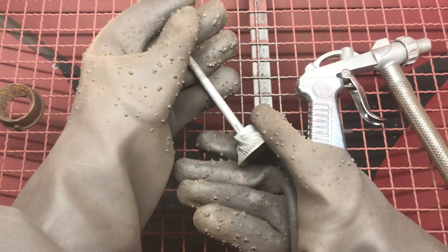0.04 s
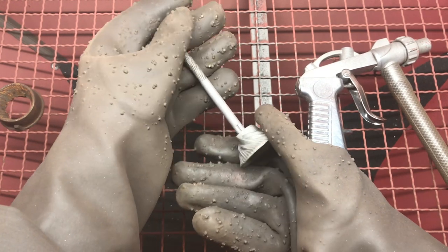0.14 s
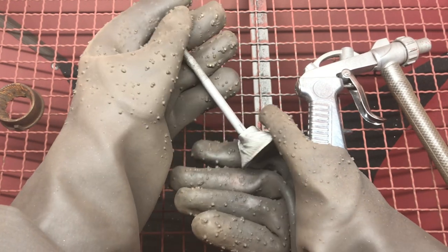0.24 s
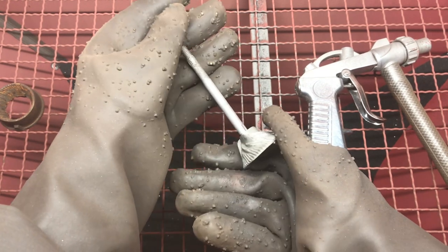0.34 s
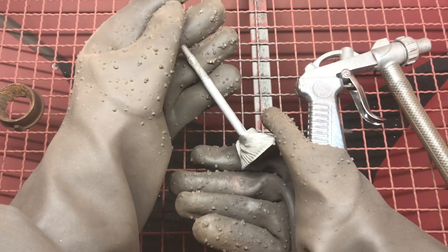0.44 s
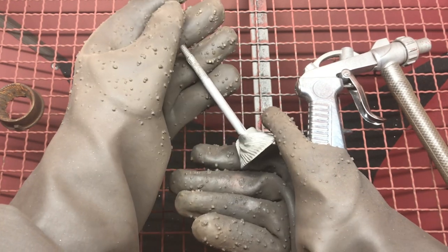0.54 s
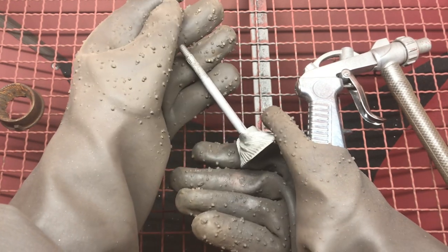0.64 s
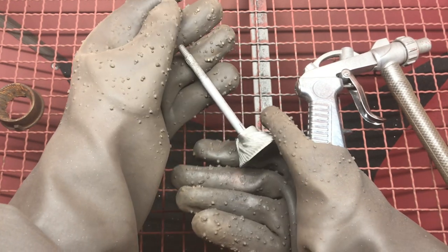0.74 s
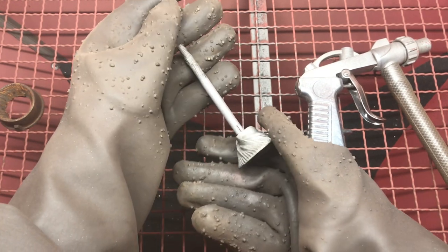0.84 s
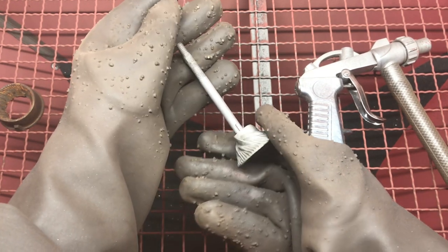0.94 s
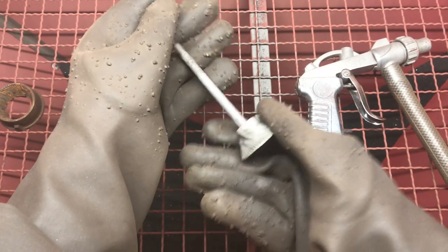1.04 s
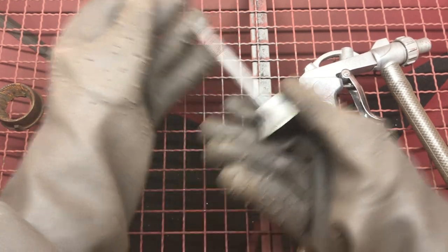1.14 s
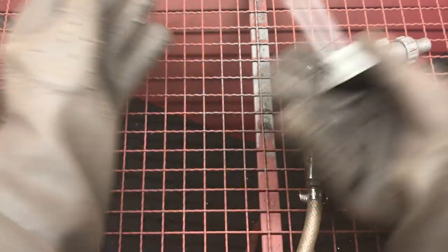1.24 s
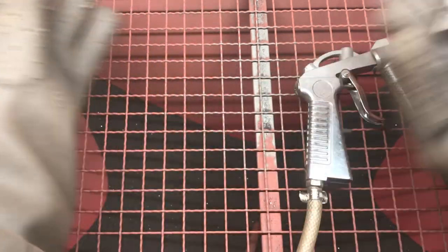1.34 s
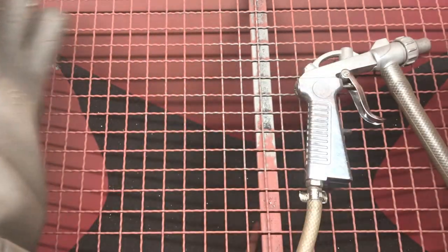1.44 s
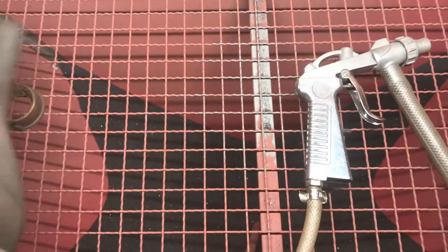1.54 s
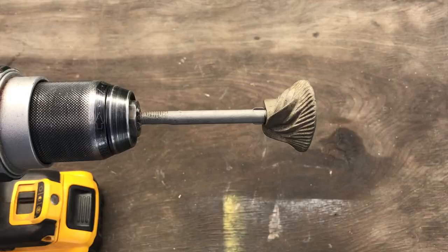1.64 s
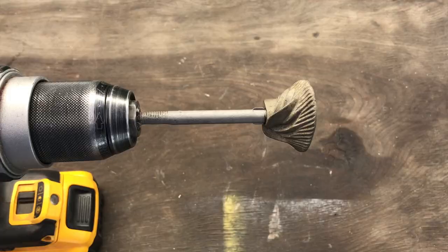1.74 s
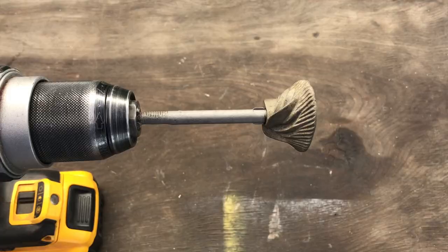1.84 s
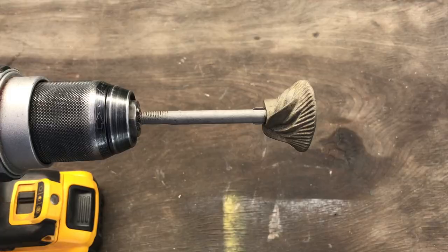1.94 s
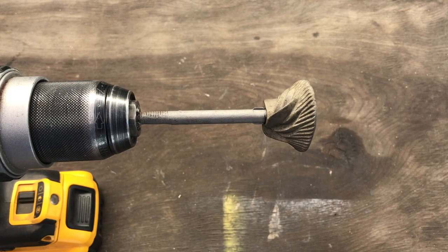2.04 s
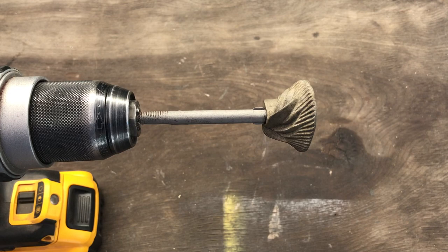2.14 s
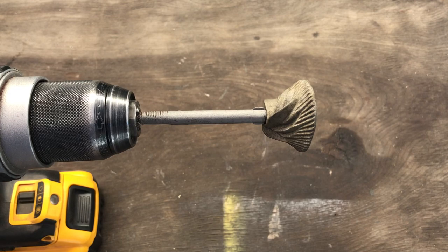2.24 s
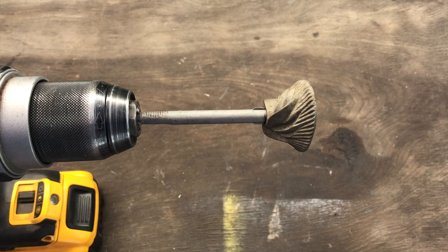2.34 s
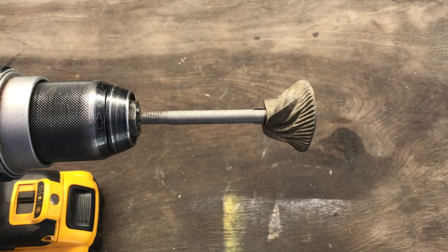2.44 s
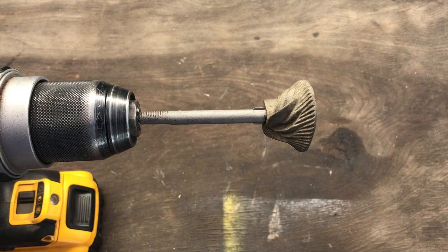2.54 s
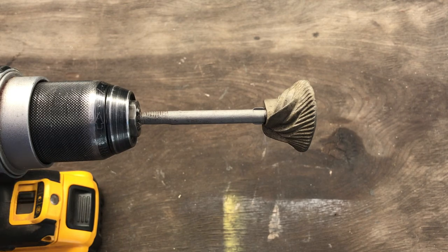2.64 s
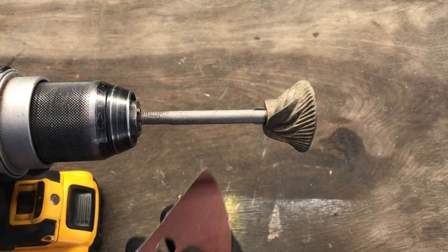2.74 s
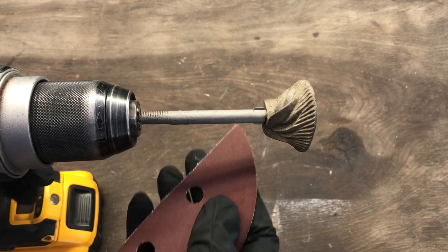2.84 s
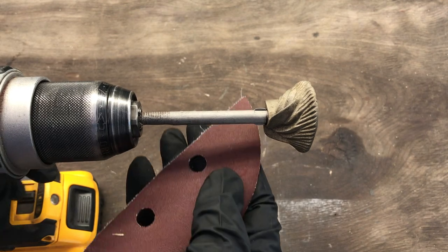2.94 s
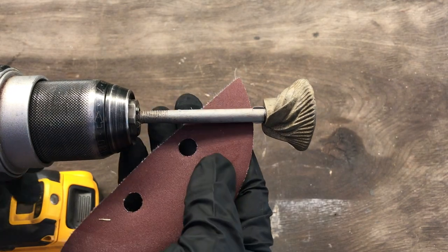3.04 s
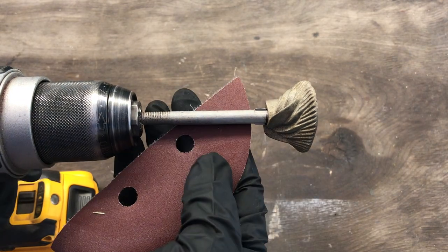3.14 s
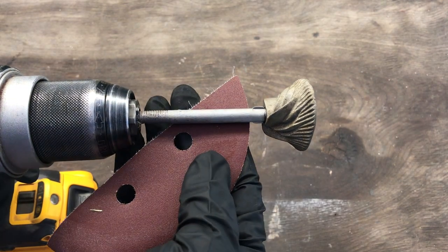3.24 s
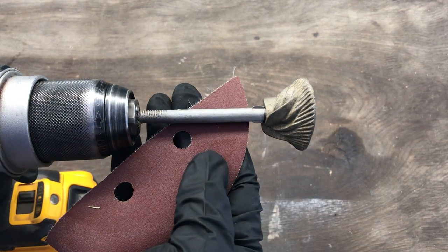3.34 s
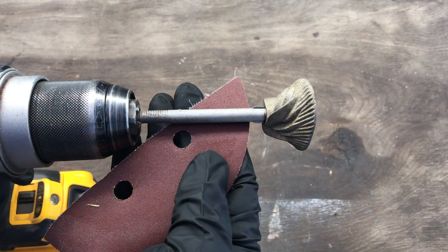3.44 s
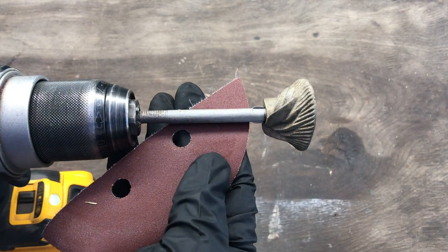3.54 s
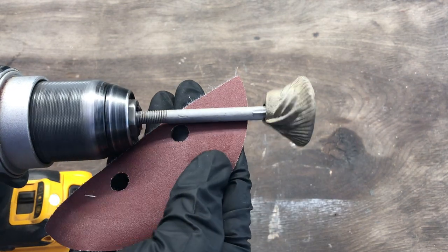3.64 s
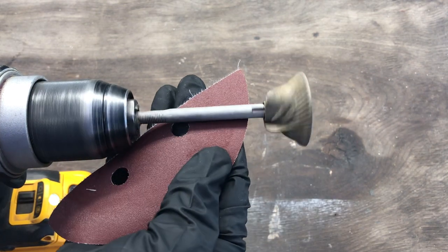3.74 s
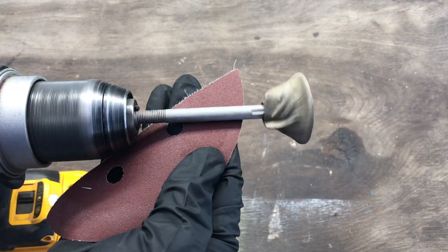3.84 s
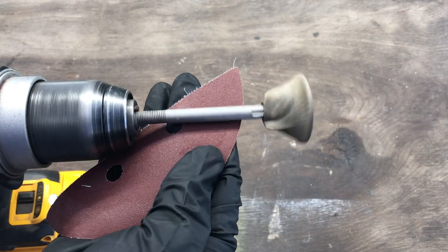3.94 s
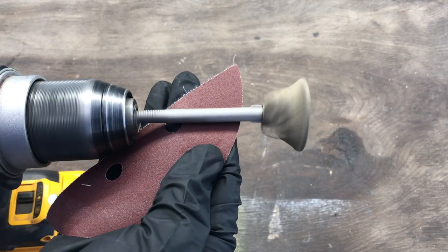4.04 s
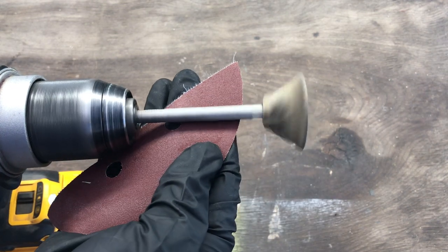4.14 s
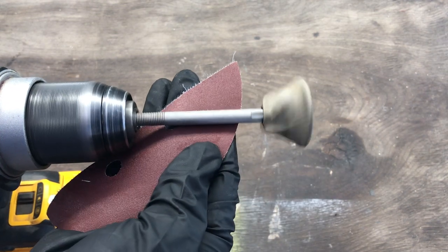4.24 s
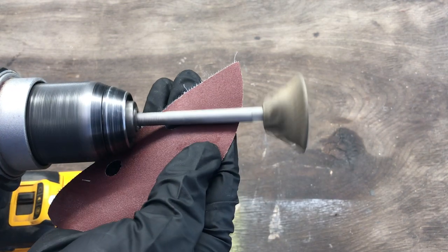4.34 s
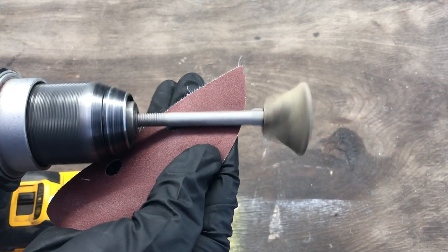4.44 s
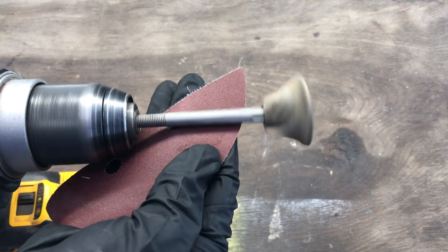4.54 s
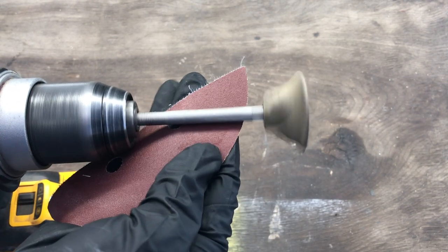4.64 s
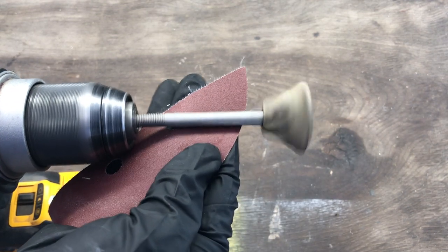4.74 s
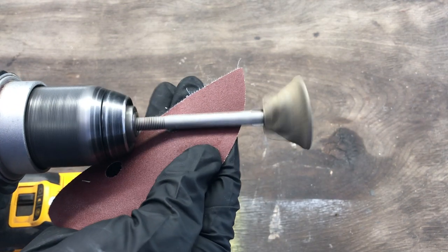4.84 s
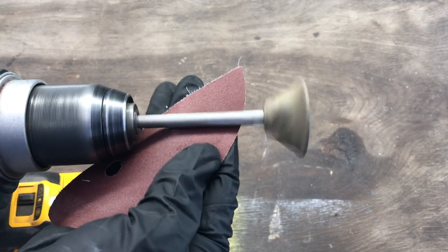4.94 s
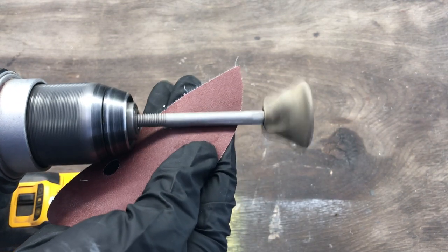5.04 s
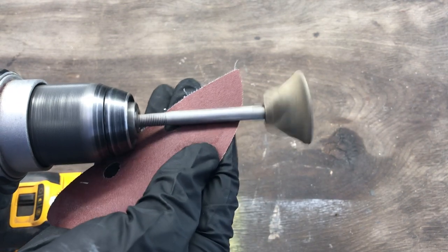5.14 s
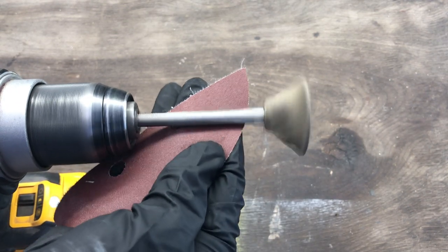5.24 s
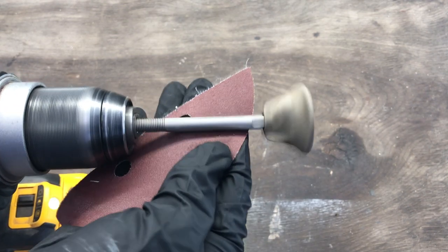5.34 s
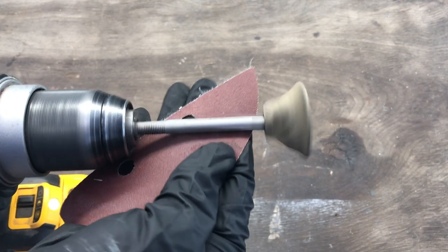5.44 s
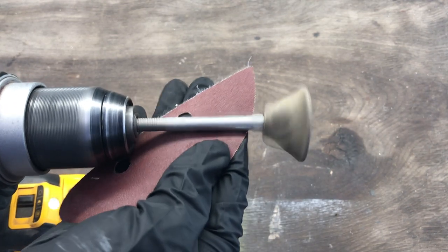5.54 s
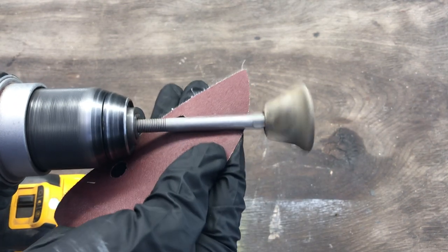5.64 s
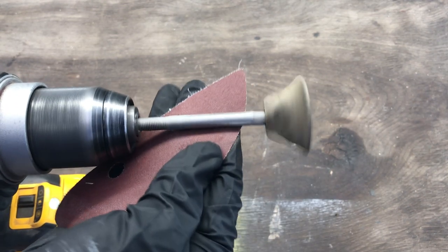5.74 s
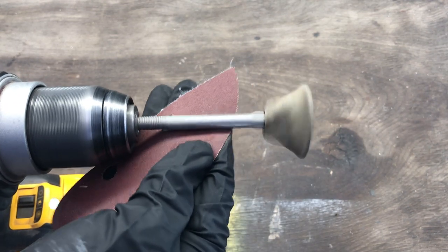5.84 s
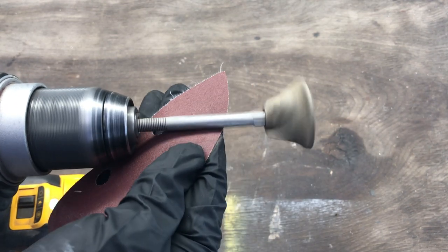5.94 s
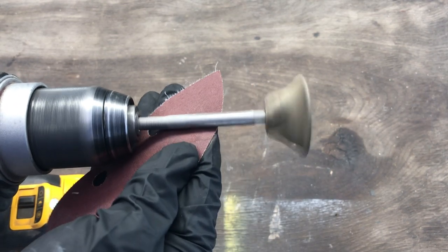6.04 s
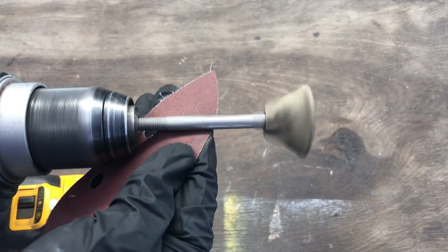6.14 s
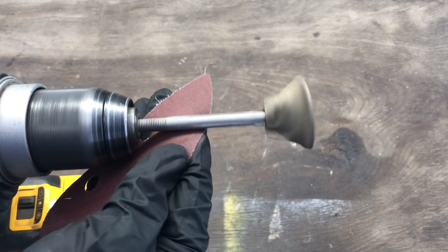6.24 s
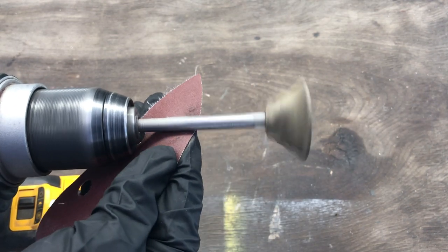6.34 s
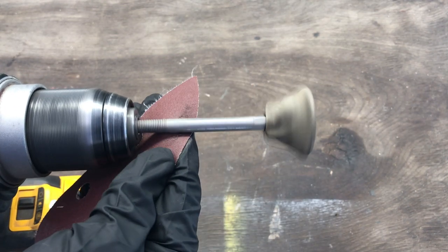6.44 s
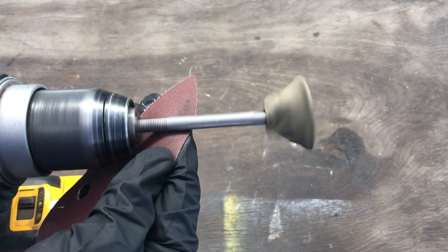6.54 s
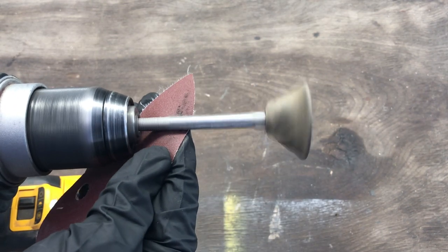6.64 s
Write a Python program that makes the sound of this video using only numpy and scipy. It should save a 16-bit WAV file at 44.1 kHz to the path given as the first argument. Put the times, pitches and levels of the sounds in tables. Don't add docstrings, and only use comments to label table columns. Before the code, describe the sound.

Boxy fan hum and whistling air, then near-silence with dry paper snaps, before a drill creeps, climbs in steps to full whine, abrasive paper hissing.

```python
import sys
import numpy as np
from scipy import signal
from scipy.fft import rfft, irfft
from scipy.io import wavfile

SR = 44100
rng = np.random.default_rng(int(sys.argv[2]) if len(sys.argv) > 2 else 0)


def wrap_up_sound(samples):
    columns = np.atleast_2d(samples).T
    tamed = np.clip(columns, -1, 1)
    steps = np.round(tamed * 32767).astype(np.int16)
    wavfile.write(sys.argv[1], SR, steps)


def invert_db(level):
    return 10 ** (np.asarray(level, dtype=float) / 20)


N = 295470
T = np.arange(N) / SR
HZ = np.maximum(np.arange(N // 2 + 1) * SR / N, 1)

FULL_SPEED = 384.5
MOTOR_ON_S, CREEP_TURNS = 3.55, 30
BITE_TURNS = 155


def at_hz(points, hz):
    points = np.array(points)
    return np.interp(np.log(hz), np.log(points[:, 0]), points[:, 1])


def rms_one(x):
    return x / np.sqrt(np.mean(x ** 2) + 1e-20)


def drift(rate):
    r = np.exp(-80 * np.pi * rate / SR)
    noise = rng.standard_normal(N // 40 + 2002)
    slow = signal.lfilter([1], [1, -2 * r, r * r], noise)[2000:]
    return np.interp(np.arange(N) / 40, np.arange(len(slow)), rms_one(slow))


def swell(start, length, attack, release):
    rise = np.clip((T - start) / attack + 1, 0, 1) ** 2
    return rise * np.exp(-np.maximum(T - start - length, 0) / release)


def ring(clicks, hz, t60):
    r, w = invert_db(-60 / (t60 * SR)), 2 * np.pi * hz / SR
    return signal.lfilter([0, np.sin(w)], [1, -2 * r * np.cos(w), r * r], clicks + 1e-18)


def line(phase, rough, rate):
    in_step = (1 + rough * drift(rate)) * np.sin(phase)
    return np.sqrt(2) * (in_step + rough * drift(rate) * np.cos(phase))


def grains(per_s, spread_db):
    sizes = invert_db(spread_db * np.minimum(rng.exponential(1, N), 5)) * rng.choice([-1, 1], N)
    return sizes * (rng.random(N) < per_s / SR)


def shaped(x, colour_db, patchy_db, ref=(20, 20000)):
    spec = rfft(x) * invert_db(colour_db) * (HZ < 15760)
    in_ref = (HZ > ref[0]) & (HZ < ref[1])
    spec = spec / np.sqrt(2 * np.sum(abs(spec[in_ref]) ** 2)) * N
    out, together = 0, drift(6.2)
    for octave in range(4, 15):
        share = np.cos(np.pi / 2 * np.clip(np.log2(HZ) - octave, -1, 1)) ** 2
        flicker = invert_db(patchy_db * (0.4 * together + 0.29 * drift(37)))
        out = out + irfft(spec * share, N) * flicker
    return out


def drill():
    turns = motor_speed()
    shake = (turns / FULL_SPEED) ** 3
    slack = 1 - np.minimum(shake, 1)
    strain = np.tanh(np.maximum(np.gradient(np.log(turns)) * SR, 0) / 13.4)
    unsteady_turns = turns * (1 + .0006 * drift(5) + .002 * drift(60))
    angle = 2 * np.pi * np.cumsum(unsteady_turns) / SR
    creeping = np.clip(1 - (turns - 63) / 6, 0, 1)
    jolt = swell(MOTOR_ON_S + 0.0034, 0.0097, .006, 0.0023)
    whine = motor_whine(turns, angle, shake, slack, strain, creeping)
    gears = gear_rush(turns, angle, slack, strain, jolt)
    rub = paper_rub(turns, angle, slack, strain, creeping, jolt)
    running = np.clip((T - MOTOR_ON_S) / 0.0065, 0, 1)
    return running * (whine + control_whistle() + gears + rub)


def motor_speed():
    # t/s, speed aimed at/turns per s, lag/s
    squeezes = [
        (3.62, 70, .026),
        (3.821, 113, .012),
        (3.895, 150, .005),
        (3.9, 205, .024),
        (4.075, 222, .018),
        (4.12, 295.5, .022),
        (4.329, 471.7, .0234),
        (4.364, 384.6, .0201),
    ]
    turns, aim = np.full(N, float(CREEP_TURNS)), CREEP_TURNS
    for s, new_aim, lag in squeezes:
        age = np.maximum(T - s, 0) / lag
        turns = turns + (new_aim - aim) * (1 - (1 + age) * np.exp(-age))
        aim = new_aim
    return turns


def motor_whine(turns, angle, shake, slack, strain, creeping):
    order_numbers = [.1745, .349, .482, .8255, 1, 1.1745, 2, 3, 4, 5, 6, 7, 7.087, 8, 9, 10, 11, 12, 14, 15,
                     16, 17, 20, 23, 24]
    order_db = [-28, -30, -38, -40, -28, -39, -45, -50, -41, -42, -56, -52, -58, -35, -50, -48.5, -50, -59,
                -55, -43, -43, -50, -53, -46, -50]
    # f/Hz, level/dB
    housing = [(80, -38), (385, -20), (640, -24), (1050, -9), (1300, -9), (1600, -25), (2000, -27),
               (2600, -6), (3050, 0), (3450, -5), (4250, -4), (5000, -23), (6150, -3), (7700, -14)]
    unbalanced = [.1745, .349, .482, .8255, 1.1745, 7, 7.087, 9, 11, 15, 17, 23, 24]
    wobble = [2, 3]
    pole_pass, cogging = 8, 12
    idling = 1 / (1 + (turns / BITE_TURNS) ** 8)
    whine = 0
    for k, db in zip(order_numbers, order_db):
        height = invert_db(db + at_hz(housing, k * turns))
        if k in unbalanced:
            height *= shake ** 2
        elif k in wobble:
            height *= np.sqrt(shake)
        elif k == pole_pass:
            height *= shake ** .75
        if k < 6:
            height *= 1 - .75 * idling
        if k == cogging:
            octaves_off = np.log2(turns / 118)
            height *= 1 + invert_db(16) * np.exp(-(octaves_off / .45) ** 2)
        rough = .16 + .2 * slack * (k < 2)
        whine = whine + height * line(k * angle + rng.uniform(0, 7), rough, rate=30)
    load_db = -.3 + 0.5 * slack + 1 * strain
    return whine * invert_db(load_db) * (1 - .95 * creeping)


def control_whistle():
    # t/s, length/s, level/dB
    chirps = [
        (3.725, .02, -55.5),
        (3.84, .015, -53),
    ]
    chopper = 2 * np.pi * 11027 * T
    height = sum(invert_db(db) * swell(s, length, 0.013, 0.037) for s, length, db in chirps)
    upper = line(chopper + 260 * 2 * np.pi * T, rough=.4, rate=20)
    return height * (line(chopper, rough=.3, rate=20) + .5 * upper)


def gear_rush(turns, angle, slack, strain, jolt):
    # f/Hz, level/dB per Hz
    gear_colour = [(40, -48), (90, -28), (140, -1), (300, -6.5), (500, -8), (720, -13.5), (1280, -2),
                   (2000, -11), (2900, -2.5), (3500, -5.5), (4250, 1), (4900, -11.5), (7000, -52)]
    gears = shaped(rng.standard_normal(N), at_hz(gear_colour, HZ), patchy_db=1.4, ref=(500, 2500))
    for band_hz, share in [([230, 800], .75), ([3700, 4800], .55)]:
        body = signal.butter(2, band_hz, "band", fs=SR, output="sos")
        gears -= share * slack ** 2 * signal.sosfilt(body, gears)
    gears *= 1 + 0.13 * np.sin(angle)
    gear_db = -50.0 + 3.5 * np.log2(turns / FULL_SPEED) + 5 * strain
    return (invert_db(gear_db) + invert_db(-58.5) * jolt) * gears


def paper_rub(turns, angle, slack, strain, creeping, jolt):
    # f/Hz, level/dB per Hz
    rub_colour = [(2500, -24), (5000, -1.5), (6300, 6.5), (7500, 1.5), (8500, 6), (9600, 2.5), (10600, -4),
                  (11500, -1), (12700, 3.5), (14000, -3.5), (15200, 2.5), (16000, -11)]
    grit = rng.standard_normal(N) + .3 * grains(1400, spread_db=-13)
    rub = shaped(grit, at_hz(rub_colour, HZ), patchy_db=0.2, ref=(7000, 15000))
    rub *= (1 + 0.13 * np.sin(angle / 12.0)) * (1 + 0.13 * np.sin(angle))
    idling = 1 / (1 + (turns / BITE_TURNS) ** 8)
    rub_db = -44.5 + np.log2(np.minimum(turns / 210, 1)) + 2.5 * strain - 4 * idling
    unsteady_db = (0.5 + 0.91 * slack) * drift(12)
    unsteady_db = unsteady_db + creeping * (-6 + 2.5 * drift(45))
    return (invert_db(rub_db + unsteady_db) + invert_db(-47.5) * jolt) * rub


def paper():
    # t/s, length/s, level/dB, brightness (below 0 dull, above 0 sharp)
    strokes = [(2.012, .09, -79, -2.6), (2.085, .03, -76, -.6), (2.12, .15, -82, -.2),
               (2.447, .035, -74, -.5), (2.54, .17, -81, -.5), (2.82, .1, -85, .2), (3.035, .065, -77, .25),
               (3.143, .012, -75, .87), (3.283, .02, -74, .9), (3.38, .03, -80, .3), (3.465, .01, -75, .6),
               (3.52, .035, -76, .3)]
    # t/s, peak level/dB, centre f/Hz
    paper_snaps = [(2.613, -62, 7000), (2.6818, -54, 5000), (2.9382, -56, 6550), (3.0355, -50, 8000),
                   (3.05, -44, 9220), (3.0684, -34, 6370), (3.0734, -48, 6380), (3.1443, -59, 8000),
                   (3.1577, -45, 8860), (3.1951, -56, 10000), (3.2121, -41, 13000), (3.2424, -61, 8550),
                   (3.27, -38, 14600), (3.2754, -43, 14200), (3.2914, -49, 12000), (3.3134, -60, 12400),
                   (3.3333, -62, 12300), (3.3674, -60, 11500), (3.3782, -33, 14200), (3.4126, -56, 11400),
                   (3.4655, -47, 11700), (3.4734, -50, 14100), (3.4864, -52, 6370), (3.5254, -53, 7190),
                   (3.5523, -29, 13400)]
    # t/s, peak level/dB
    gear_ticks = [
        (3.5917, -28),
        (3.6064, -31),
        (3.6194, -38),
        (3.6331, -31),
        (3.6384, -33),
        (3.6646, -32),
        (3.686, -35),
        (3.696, -32),
    ]
    level = invert_db(-82.5) * (.3 + .7 * swell(2.0, 9, .05, 1))
    tint = 0
    for s, length, db, brightness in strokes:
        attack, release = .3 * length, .2 * length
        stroke = invert_db(db) * swell(s + attack / 2, length - attack, .004 + attack, .004 + release)
        level = level + stroke
        tint = tint + brightness * stroke
    bright = tint / level
    rough = rng.standard_normal(N) + grains(300 * invert_db(6 * drift(30) + 8 * bright), spread_db=4)
    dull_db = at_hz([(2500, -25), (3300, 0), (4500, -3), (5500, -15), (16000, -26)], HZ)
    sharp_db = at_hz([(3000, -20), (7000, 0), (9000, -1), (10500, -6), (13000, -4), (16000, -10)], HZ)
    dull = shaped(rough, dull_db, patchy_db=1)
    sharp = shaped(rough, sharp_db, patchy_db=1)
    rustle = invert_db(-6 * bright) * dull + invert_db(6 * bright) * sharp
    out = invert_db(-4 + 1.3 * drift(12)) * level * rustle
    age = np.arange(300) / SR
    snaps = paper_snaps + [(s, db, 8000) for s, db in gear_ticks]
    for s, db, hz in snaps:
        crack = rng.standard_normal(300) * (np.exp(-age / .00015) + .15 * np.exp(-age / .0018))
        band = signal.butter(2, [.5 * hz, min(2.5 * hz, 19000)], "band", fs=SR, output="sos")
        crack = signal.sosfilt(band, crack)
        i = round((s + .0007) * SR)
        out[i:i + 300] += invert_db(db + 0.5) * crack / abs(crack).max()
    return out


def trigger():
    # t/s, level/dB
    contacts = [
        (3.554, -40.5),
        (3.556, -51),
        (3.56, -54),
        (3.562, -42.5),
        (3.564, -55),
    ]
    # f/Hz, level/dB, t60/s
    modes = [
        (1280, 0, 0.032),
        (4150, 2, 0.011),
        (2720, -19, .015),
        (8400, -5, 0.0085),
        (13500, -6, .01),
    ]
    at = [round(s * SR) for s, db in contacts]
    contact_db = np.array(contacts)[:, 1]
    out = np.zeros(N)
    for hz, mode_db, t60 in modes:
        clicks = np.zeros(N)
        clicks[at] = invert_db(contact_db + mode_db + rng.normal(0, 3, len(at)))
        out += ring(clicks, hz, t60)
    return out


def extractor():
    # multiple of the shaft rate, level/dB
    fan_orders = [(1, -3), (2, -6.5), (3, -15), (4, -3), (5, -14), (6, -11), (7, -10.5), (8, -2), (9, -1),
                  (10, 2), (11, 2.5), (12, -39), (13, -13)]
    # f/Hz, level/dB
    fan_tones = [
        (675.4, -57),
        (933, -64),
        (1982, -66),
        (2252, -62),
        (3799, -72),
        (3887, -71),
        (3977, -72),
    ]
    # f/Hz, level/dB per Hz
    fan_rush = [(18, -30), (30, -22), (70, -10.5), (131, -12), (184, -14), (227, -15), (486, -6),
                (554, -8.5), (760, -16), (962, -9.5), (1590, -19), (2680, -16), (7470, -42.5), (13300, -47),
                (16000, -45)]
    # f/Hz, width/Hz, level/dB
    cabinet = [(198, 33, 7.5), (272.7, 14, 13), (300, 50, 8.5), (344, 41, 8), (399, 28, 2),
               (508, 69, -10.5), (850, 66, -2.5), (945, 200, -1.5), (2650, 910, 6.5), (4000, 140, 3),
               (9530, 770, 10), (13350, 1500, 12.5)]
    turn = 2 * np.pi * 44.7 * T
    hum = sum(invert_db(db) * line(k * turn + rng.uniform(0, 7), rough=.17, rate=4) for k, db in fan_orders)
    tones = 0
    for hz, db in fan_tones:
        tones = tones + invert_db(db + 2 * drift(.7)) * line(2 * np.pi * hz * T, rough=.6, rate=5)
    late = line(2 * np.pi * 3138 * T, rough=.4, rate=5)
    tones += invert_db(-61) * swell(1.3, 1, .6, 1) * late
    boxed_db = sum(db / (1 + (2 * (HZ - hz) / width) ** 2) for hz, width, db in cabinet)
    rush = shaped(rng.standard_normal(N), at_hz(fan_rush, HZ) + boxed_db, patchy_db=1.4)
    duct = signal.butter(2, 38, "high", fs=SR, output="sos")
    return invert_db(-49) * hum + tones + invert_db(-40.5) * signal.sosfilt(duct, rush)


def bench():
    # f/Hz, level/dB per Hz
    room = [(15, -41), (30, -16.5), (90, -5.5), (160, -8), (260, -10.5), (400, -18), (520, -21), (680, -17),
            (1000, -13), (1800, -23.5), (2900, -35), (5000, -72), (16000, -69)]
    # t/s, peak level/dB, f/Hz
    thuds = [
        (2.468, -53.5, 185),
        (2.669, -49.5, 143),
    ]
    tone = invert_db(-62.5) * shaped(rng.standard_normal(N), at_hz(room, HZ), patchy_db=3.0, ref=(400, 2500))
    rumble = signal.sosfilt(signal.butter(2, 130, fs=SR, output="sos"), tone)
    out = tone - rumble + invert_db(-64 + 3.5 * drift(2.4)) * rms_one(rumble)
    for s, db, hz in thuds:
        age = np.maximum(T - s, 0)
        out += invert_db(db - 0.5) * np.sin(2 * np.pi * hz * age) * age / 0.0091 * np.exp(1 - age / 0.0083)
    return out


def scene():
    later = np.clip((T - 1.678) / 0.002 + .5, 0, 1)
    at_bench = drill() + paper() + trigger() + bench()
    mono = (1 - later) * extractor() + later * at_bench
    return np.array([mono, mono])


def band_limit(x):
    return signal.sosfilt(signal.butter(12, 16790, fs=SR, output="sos"), x)


def record(dry):
    top_cut = signal.cheby2(10, 40, 16850.0, fs=SR, output="sos")
    mix = signal.sosfilt(top_cut, dry)
    return band_limit(mix)


dry = scene()
out = record(dry)
wrap_up_sound(out)
```